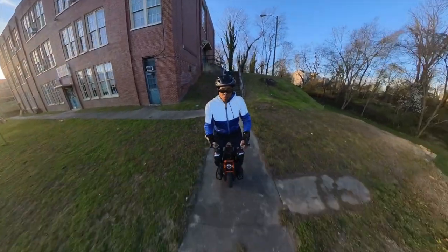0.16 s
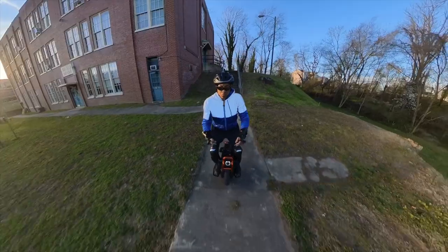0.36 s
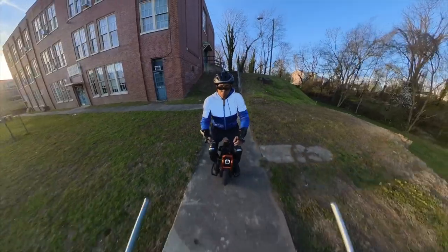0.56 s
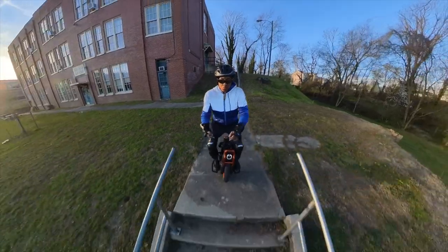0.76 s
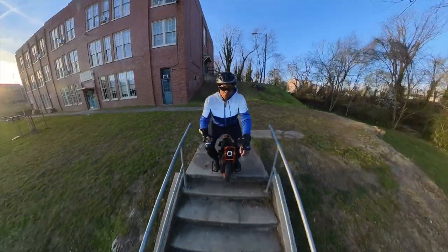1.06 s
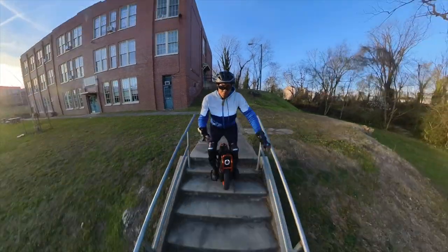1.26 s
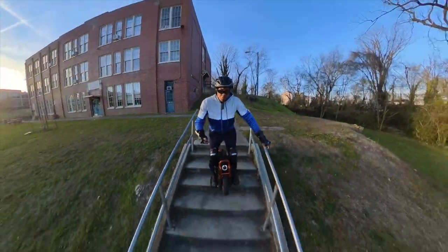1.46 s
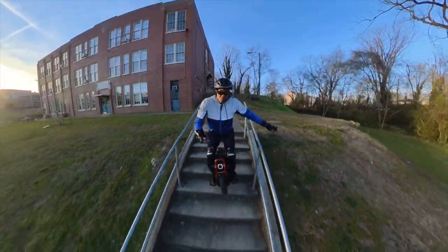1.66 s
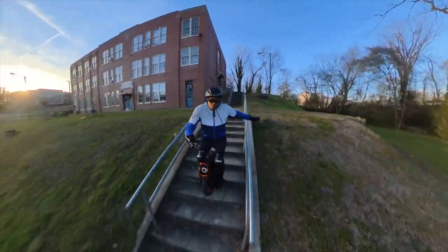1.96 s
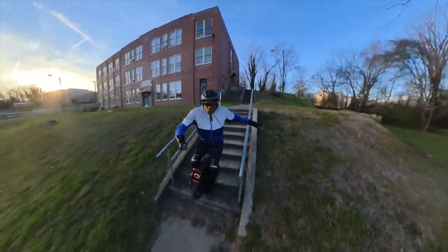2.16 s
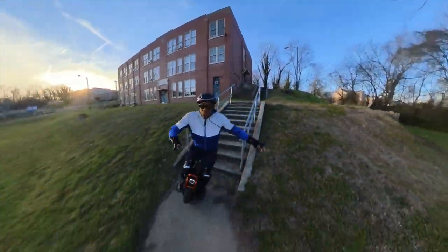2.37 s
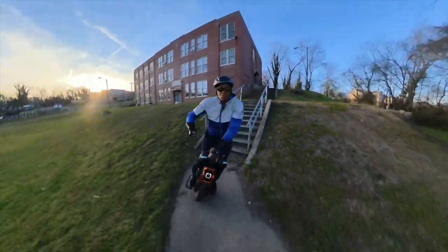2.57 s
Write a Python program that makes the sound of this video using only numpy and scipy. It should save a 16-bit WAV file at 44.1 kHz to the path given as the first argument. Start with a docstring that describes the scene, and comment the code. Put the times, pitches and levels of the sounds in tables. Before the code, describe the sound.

An electric one-wheel vehicle rolls on concrete in wind, then rattles and knocks down outdoor steps

```python
"""On a concrete path and a flight of steps, an electric one-wheel vehicle rolls along, then rides down.
Wind is shaped noise with single swinging buffets; far air, tyre hum and motor whine are shaped noise.
A bird's two faint chirps are gliding tones, and ticks are clicks and short ringing bursts.
On the steps the tyre lands and the plastic shell and pedals knock and rattle: noise bursts through
resonances, with decaying notes, one deep boom and a buzz of loose parts."""
import sys
import numpy as np
from scipy import signal
from scipy.fft import rfft, irfft, next_fast_len
from scipy.io import wavfile
from scipy.ndimage import uniform_filter1d, map_coordinates

SR = 44100
rng = np.random.default_rng(int(sys.argv[2]) if len(sys.argv) > 2 else 0)


def digitize_waveform(pressure):
    """Quantize a signal to 16-bit integers and store it at the path in sys.argv[1].

    Rows of a 2-D input are taken as channels; values are limited to [-1, 1].
    """
    field = np.atleast_2d(pressure).T
    bounded = np.clip(field, -1, 1)
    quanta = np.round(bounded * 32767).astype(np.int16)
    wavfile.write(sys.argv[1], SR, quanta)


N = 119070
T = np.arange(N) / SR  # time of every sample [s]


def amp(db):
    """Turn decibels into a plain gain."""
    return 10 ** (np.asarray(db) / 20)


def unit(x):
    """Scale x to an rms of 1."""
    return x / np.sqrt(np.mean(x ** 2) + 1e-20)


def curve(rows, column=1):
    """Draw straight lines through one column of (time, ..) rows, one value per sample."""
    return np.interp(T, np.transpose(rows)[0], np.transpose(rows)[column])


def wobble(rate):
    """A smooth random curve with rate random points a second."""
    return map_coordinates(rng.standard_normal(int(N * rate / SR) + 4), [T * rate])


def filtered(x, response):
    """Multiply the spectrum of x by a response of frequency."""
    size = next_fast_len(N + 8192)  # spare room so that ringing does not wrap round
    return irfft(rfft(x, size) * response(np.fft.rfftfreq(size, 1 / SR)), size)[:N]


def colour(points):
    """A smooth tone: gain between (frequency, level) points on a log frequency axis."""
    hz, db = np.transpose(points)
    return lambda f: amp(np.interp(np.log(f + 1), np.log(hz + 1), db))


def ringing(modes):
    """Resonances that ring on after a push, falling steeply far above the last one listed."""
    def response(f):
        total = 0
        for k, (centre, width, db) in enumerate(modes):
            resonance = 1j * f * width / (centre * centre - f * f + 1j * f * width)
            total = total + (-1) ** k * amp(db) * resonance  # neighbours have opposite signs
        return total / (1 + 1j * f / (2 * modes[-1][0])) ** 2
    return response


def noise(response, flicker_db=0, patchy_db=0):
    """Coloured noise of rms 1 with a fast flicker and patches of random gain in time and pitch."""
    source = rng.standard_normal(N) * amp(flicker_db * wobble(60))
    spectrum = signal.stft(source, nperseg=256)[2]
    across_pitch = uniform_filter1d(rng.standard_normal(spectrum.shape), 5, 0)
    patches = unit(uniform_filter1d(across_pitch, 9, 1))
    patched = signal.istft(spectrum * amp(patchy_db * patches), nperseg=256)[1][:N]
    return unit(filtered(patched, response))


# Strength of the rolling sounds before trims: (time [s], tyre hum level [dB], motor whine level [dB])
ROLLING_LEVELS = [(0.0, -54, -87.5), (0.532, -55, -82.5), (0.56, -55, -102), (0.644, -53.5, -73),
                  (0.762, -55.5, -90), (0.79, -53, -87.5), (0.95, -54.5, -99), (0.99, -53.5, -83.5),
                  (1.082, -54.5, -102), (1.106, -53, -88), (1.222, -53.5, -80.5), (1.258, -66.5, -102),
                  (1.362, -58, -77), (1.44, -54, -77)]
# Tone of the far air: (frequency [Hz], relative level [dB])
AIR_TONE = [(1290, -30.5), (2200, -11), (3030, -9.5), (3430, -3), (3770, -9), (7790, -15), (10800, -22.5),
            (12500, -37.5), (16200, -67.5), (22000, -120)]


def far_air():
    """Faint patchy hiss whose level dips briefly around 1.26 s."""
    air_db, dip_share = -78, 0.81
    curve_db = curve(ROLLING_LEVELS)
    level = amp(air_db + dip_share * (curve_db - np.median(curve_db)))
    return level * noise(colour(AIR_TONE), patchy_db=4.0)


# Strength of the wind before trims: (time [s], deep rumble level [dB], flutter level [dB])
WIND_LEVELS = [(0.0, -41, -41.5), (0.3, -33, -32), (0.86, -36, -36), (0.88, -29.5, -31), (0.98, -28, -29),
               (1.01, -48, -39.5), (1.08, -18, -27.5), (1.11, -27, -30.5), (1.29, -33.5, -29),
               (1.49, -28, -31), (1.6, -40, -37.5), (1.66, -28, -33.5), (1.8, -38, -34.5),
               (2.03, -26.5, -30), (2.09, -35, -34), (2.16, -27, -21.5), (2.2, -28.5, -32.5),
               (2.23, -23.5, -37), (2.32, -40, -30.5), (2.41, -31.5, -29.5), (2.62, -43.5, -37.5),
               (2.7, -42, -32)]
# Tone of the deep rumble: (frequency [Hz], relative level [dB])
RUMBLE_TONE = [(12, -44.5), (20, -20.5), (44, 3.5), (81, 1), (100, -4.5), (130, -37.5), (220, -120)]
# Tone of the flutter: (frequency [Hz], relative level [dB])
FLUTTER_TONE = [(53, -40.5), (90, -3), (184, -5), (242, -7.5), (378, -25), (450, -28.5), (580, -58),
                (990, -120)]
# A sharper, higher gust: (time [s], level [dB])
GUST_LEVELS = [(1.14, -68), (1.18, -44), (1.22, -30), (1.25, -33.5), (1.28, -22.5), (1.33, -47),
               (1.40, -37.5), (1.45, -77)]
# Tone of that gust: (frequency [Hz], relative level [dB])
GUST_TONE = [(180, -41), (270, 9.5), (400, 4.5), (520, -14), (700, -63), (1100, -120)]
# Single pressure buffets; the swell peaks after the start by its own length, at least 0.3 cycles:
# (start time [s], swell peak level [dB], pitch [Hz], swell length [cycles])
WIND_BUFFETS = [(0.115, -22.5, 167, 2.5), (0.149, -25.5, 228, 1.3), (0.226, -13.5, 168, 0.88),
                (0.242, -12, 196, 1.2), (0.295, -12, 144, 0.86), (0.41, -13.5, 142, 1.2),
                (0.436, -16.5, 195.4, 1.56), (0.556, -21, 168, 2.2), (0.612, -15.5, 208, 1.2),
                (0.84, -23.5, 198.6, 2.4), (0.956, -14.5, 170.3, 1.68), (1.069, -9.5, 92.6, 0.65),
                (1.184, -9.5, 202, 0.57), (1.195, -15.5, 151, 0.75), (1.212, -12, 230, 1.2),
                (1.227, -7.5, 233.4, 1.46), (1.246, -17.5, 192.7, 2), (1.276, -9, 276, 0.48),
                (1.327, -14.5, 220, 0.74), (1.36, -15.5, 163.4, 0.87), (1.4, -12, 158, 0.94),
                (1.452, -25, 188, 0.95), (1.489, -24, 181, 1.8), (1.632, -20, 82, 0.8),
                (1.723, -24, 161.6, 1.3), (1.811, -28, 129, 1.9), (1.89, -23.5, 158, 1.9),
                (1.986, -21, 115, 1.3), (2.048, -28.5, 118, 1.6), (2.14, -20.5, 82, 1.3),
                (2.158, -14, 190, 0.83), (2.232, -26, 109, 0.33), (2.316, -17.5, 194, 1.35),
                (2.414, -15, 104, 1.4), (2.426, -17.5, 138, 2.2), (2.507, -32, 171, 0.59)]


def wind():
    """Moving air makes a deep rumble, a lumpy flutter, a gust and short pressure swings."""
    out = amp(curve(WIND_LEVELS) - 1.5) * noise(colour(RUMBLE_TONE))
    out = out + amp(curve(WIND_LEVELS, column=2) + 3.5) * noise(colour(FLUTTER_TONE), flicker_db=3.0)
    out = out + amp(curve(GUST_LEVELS)) * noise(colour(GUST_TONE))
    for start, db, hz, cycles in WIND_BUFFETS:
        u = (T - start) * hz / max(cycles, .3) - 1
        swing = np.sin(2 * np.pi * hz * (T - start) + rng.uniform(0, 2 * np.pi))
        out = out + amp(db) * np.exp(-u * u) * swing
    return out


# Faint bird chirps, level before its wobble:
# (start time [s], length [s], first pitch [Hz], last pitch [Hz], arch in pitch [Hz], level [dB])
BIRD_CHIRPS = [(0.167, 0.11, 2440, 2650, 70, -68), (0.309, 0.1, 2380, 2240, 60, -72.5)]


def bird():
    """Each chirp is one pure tone that glides along an arch while pitch and level waver."""
    out = np.zeros(N)
    for start, length, first_hz, last_hz, arch_hz, db in BIRD_CHIRPS:
        u = np.clip((T - start) / length, 0, 1)
        arch = np.sin(np.pi * u)
        pitch = first_hz + (last_hz - first_hz) * u + arch_hz * arch + 25 * wobble(70)
        tone = np.sin(2 * np.pi * np.cumsum(pitch) / SR)
        out = out + amp(db + 2.5 * wobble(70)) * arch * tone
    return out


# Short dry ticks, the first one ringing: (time [s], level before boosts [dB], ringing share [0-1])
TICKS = [(0.918, -46, 0.9), (1.2178, -43, 0.05), (1.258, -61, 0.14), (1.268, -68, 0.1),
         (1.278, -55.5, 0.05), (1.3192, -59.5, 0.05)]
# What a tick rings with: (frequency [Hz], width [Hz], relative level [dB])
TICK_MODES = [(2840, 240, -3), (4100, 260, 0), (9700, 600, -12.5)]


def ticks():
    """Each tick mixes a dry snap with a ringing burst and its scattered tail."""
    snaps, rings = np.zeros((2, N))
    scatter = rng.standard_normal(N) * amp(2.0 * wobble(200))
    for s, db, share in TICKS:
        snaps[round(s * SR)] = (1 - share) * amp(db + 13)
        tail = amp(-16.5 - 60 * np.abs(T - s) / 0.17) * (T > s)
        burst = np.exp(-((T - s) / 0.0011) ** 2) + tail
        rings += share * amp(db + 12) * burst * scatter
    crack = colour([(1200, -40.5), (2000, 4), (4500, -5.5), (8000, -15), (11000, -26.5), (13000, -52)])
    return filtered(snaps, crack) + filtered(rings, ringing(TICK_MODES))


def motor_whine():
    """The motor's narrow band of noise sounds like an unsteady note."""
    whine_hz, width_hz, trim_db = 3361, 27, 2
    line = ringing([(whine_hz, width_hz, 0)])
    level = amp(curve(ROLLING_LEVELS, column=2) + trim_db + 1.1 * wobble(31))
    return level * noise(lambda f: line(f) ** 2)  # squared: an even narrower band


# Tone of the tyre on concrete: (frequency [Hz], relative level [dB])
ROAD_TONE = [(180, -38.5), (300, -3.5), (379, -6.5), (415, -4), (664, -8.5), (1020, -14), (1540, -29.5),
             (2600, -47), (3380, -74), (5720, -120)]


def tyre_hum():
    """The tyre rolling on concrete is low noise with a slight flicker."""
    return amp(curve(ROLLING_LEVELS) + 10.0) * noise(colour(ROAD_TONE), flicker_db=0.7)


# Loose parts buzzing: (time [s], level [dB])
RATTLE_LEVELS = [(1.43, -92.5), (1.47, -40.5), (1.75, -42.5), (2.0, -32.5), (2.3, -40), (2.6, -36.5),
                 (2.7, -39)]
# Tone of that buzz: (frequency [Hz], relative level [dB])
BUZZ_TONE = [(190, -41), (330, -7), (412, 1.5), (685, -20.5), (1200, -21.5), (1570, -40), (3410, -39),
             (4330, -42.5), (10900, -49.5), (12400, -51), (14700, -82.5)]


def loose_parts():
    """Loose parts buzz between the knocks as flickering, patchy noise."""
    return amp(curve(RATTLE_LEVELS)) * noise(colour(BUZZ_TONE), flicker_db=3.0, patchy_db=2.0)


def landing_boom():
    """A hard landing booms in the tyre: one low note that rises fast and dies away."""
    start, level_db, hz = 1.579, -5, 285.6  # s, dB before the rise, Hz
    rise, t60 = 0.0029, 0.069  # s, s to fall by 60 dB
    t = np.maximum(T - start, 0)
    return amp(level_db - 60 * t / t60) * (1 - np.exp(-t / rise)) * np.sin(2 * np.pi * hz * t)


# Knocks on the steps, levels before trims and envelopes:
# (time [s], shell level [dB], shell note [Hz], slap level [dB], clack level [dB], treble level [dB],
#  rise time [s], time to fall by 60 dB [s], hardness [0-1]); rise and fall are adjusted per layer
STEP_KNOCKS = [(1.441, -47, 366, -41, -61, -68, 0.002, 0.04, 0.56),
               (1.461, -49.5, 430, -36, -55, -54.5, 0.0021, 0.046, 0.36),
               (1.493, -50, 434, -41, -53, -57, 0.0028, 0.046, 0.15),
               (1.509, -29, 420, -33, -50, -60, 0.00087, 0.062, 0.7),
               (1.532, -21.5, 523, -31.5, -50, -47, 0.0041, 0.067, 0.7),
               (1.557, -17, 333, -25.5, -41.5, -43.5, 0.0039, 0.035, 0.2),
               (1.577, -16, 403, -22, -26, -34.5, 0.0011, 0.045, 0.07),
               (1.637, -45, 342, -46, -56, -71, 0.003, 0.035, 0.4),
               (1.666, -18, 465, -23.5, -35, -56.5, 0.0006, 0.018, 0.78),
               (1.686, -19, 404, -31.5, -43, -43.5, 0.0045, 0.059, 0.4),
               (1.727, -26.5, 398, -35.5, -47, -45, 0.0096, 0.067, 0.7),
               (1.79, -23, 510, -28.5, -48.5, -59.5, 0.00082, 0.045, 1),
               (1.81, -11, 431, -27, -43.5, -44, 0.0076, 0.06, 0.66),
               (1.851, -51, 440, -35, -64, -48, 0.0038, 0.067, 0.54),
               (1.917, -21, 386, -27, -41, -67, 0.0025, 0.038, 1),
               (1.938, -14.5, 420, -29, -49, -48.5, 0.0023, 0.048, 0.9),
               (1.976, -26.5, 390, -36.5, -57, -45.5, 0.0026, 0.035, 0.8),
               (2.013, -12.5, 426, -21, -38.5, -43.5, 0.0038, 0.079, 0.63),
               (2.033, -9.5, 407, -30, -53, -51, 0.0027, 0.034, 1),
               (2.068, -20.5, 446, -29, -55, -59, 0.0043, 0.074, 0.23),
               (2.122, -16.5, 420, -24.5, -33.5, -42, 0.0032, 0.043, 0.8),
               (2.144, -9.5, 460, -18, -41, -41.5, 0.0016, 0.017, 0.36),
               (2.187, -18.5, 430, -33, -51, -35.5, 0.016, 0.044, 0.3),
               (2.23, -18, 385, -34.5, -46, -44, 0.00078, 0.027, 0.9),
               (2.2344, -17, 420, -21, -26.5, -34, 0.00063, 0.032, 0.16),
               (2.252, -12.5, 430, -27, -54, -40.5, 0.0044, 0.031, 0.6),
               (2.296, -16, 474, -40, -56, -65, 0.0019, 0.022, 0.95),
               (2.322, -14, 354, -24.5, -40, -45, 0.0021, 0.056, 0.6),
               (2.341, -19, 453, -33, -53.5, -54.5, 0.0017, 0.076, 0.4),
               (2.382, -15.5, 484, -32.5, -52.5, -76, 0.0021, 0.019, 0.77),
               (2.415, -9, 547, -22.5, -33, -37, 0.0039, 0.02, 0.33),
               (2.436, -9.5, 468, -30.5, -42, -44, 0.0032, 0.041, 0.55),
               (2.467, -21.5, 397, -35.5, -52, -54, 0.0025, 0.04, 0.5),
               (2.51, -11, 430, -22, -33.5, -32, 0.0014, 0.028, 0.3),
               (2.525, -3.5, 455, -16, -31, -36, 0.0028, 0.032, 0.15),
               (2.554, -8, 537, -16.5, -36.5, -35.5, 0.0028, 0.035, 0.53),
               (2.574, -17, 410, -29, -31, -42, 0.0025, 0.05, 0.4),
               (2.618, -55, 385, -55, -45, -50, 0.0025, 0.031, 0.5)]
# Resonances of the plastic shell: (frequency [Hz], width [Hz], relative level [dB])
SHELL_MODES = [(308, 140, -11.5), (432.6, 60, 0), (515, 75, -4.5), (632, 161, -8)]
# Resonances of the slap: (frequency [Hz], width [Hz], relative level [dB])
SLAP_MODES = [(794, 166, 0.5), (1028, 450, 2.5), (1192, 432, 1), (1495, 150, -10)]
# Resonances of the clack: (frequency [Hz], width [Hz], relative level [dB])
CLACK_MODES = [(1655, 250, 3.5), (1954, 440, 3.5), (2542, 490, 2), (3350, 530, 2), (4100, 260, -3.5)]
# Tone of the treble hiss: (frequency [Hz], relative level [dB])
HISS_TONE = [(2530, -16), (4300, 3), (6100, -1), (6630, -0.5), (11000, -5), (13300, -14), (14700, -39.5)]

# Four layers in this order: shell, slap, clack, hiss
LAYER_TRIM_DB = [-3.5, 0.5, 0.5, 2]
RISE_RATIO = np.array([[1], [1], [1], [0.94]])
FALL_RATIO = np.array([[1], [1], [1], [0.73]])
FALL_BEND = np.array([[1.27], [1.27], [1.046], [1.494]])  # above 1: the burst holds, then stops short
TAIL_DB, TAIL_T60_S = -22, 0.33  # the rattle that follows a knock
BLOW_DB = np.array([21.5, 16])  # first contact: slap, clack
RING_DB, RING_LONGER = -2, 1.16  # the shell's own note
PING_DB, PING_SCATTER_DB, PING_DETUNE = -8, 3, 0.0323  # clack notes, mixed anew for each knock


def knocks():
    """Blows and bursts of scrape ring the shell, slap, clack and hiss, with clear notes on top."""
    power, blows = np.zeros((2, 4, N + SR))
    notes, t = np.zeros(N + SR), np.arange(SR // 3) / SR
    chance = rng.standard_normal((len(STEP_KNOCKS), 2, len(CLACK_MODES), 1))
    clack_hz, _, clack_db = np.transpose(CLACK_MODES)[..., None]
    for (s, shell_db, hz, *upper_db, rise, t60, hard), (louder, off) in zip(STEP_KNOCKS, chance):
        start = round(s * SR)
        at = slice(start, start + len(t))
        rise, t60 = max(rise, 1e-4), max(t60, .005)
        swell = 1 - np.exp(-t / (rise * RISE_RATIO))
        swell[3] = swell[3] ** 2  # the hiss starts more gently
        fall = amp(-60 * (t / t60 / FALL_RATIO) ** FALL_BEND)
        tail = amp(TAIL_DB - 60 * t / TAIL_T60_S)
        level = amp([shell_db, *upper_db])[:, None]
        power[:, at] += (level * swell * (fall + tail)) ** 2  # overlapping bursts add as power
        blows[1:3, start] = hard * amp(upper_db)[:2] * amp(BLOW_DB)
        shell_level = amp(shell_db + RING_DB - 60 * t / (RING_LONGER * t60))
        notes[at] += shell_level * swell[0] * np.sin(2 * np.pi * hz * t)
        ping_hz = clack_hz * (1 + PING_DETUNE * off)
        pings = amp(clack_db + PING_SCATTER_DB * louder) * np.sin(2 * np.pi * ping_hz * t)
        notes[at] += amp(upper_db[1] + PING_DB) * swell[2] * fall[2] * pings.sum(axis=0)
    scrapes = [rng.standard_normal(N),
               noise(np.ones_like, flicker_db=3.5),
               noise(np.ones_like, flicker_db=0.5, patchy_db=3.5),
               noise(np.ones_like, patchy_db=3)]
    tones = [ringing(SHELL_MODES), ringing(SLAP_MODES), ringing(CLACK_MODES), colour(HISS_TONE)]
    out = notes[:N]
    for p, blow, scrape, tone, db in zip(power[:, :N], blows[:, :N], scrapes, tones, LAYER_TRIM_DB):
        layer = filtered(np.sqrt(p) * scrape + blow, tone)
        out = out + amp(db) * layer / np.std(filtered(scrape, tone))
    return out


def scene():
    """Add all sources, from the background to the knocks, in one channel."""
    background = far_air() + wind() + bird() + ticks()
    vehicle = motor_whine() + tyre_hum() + loose_parts() + landing_boom() + knocks()
    return (background + vehicle)[None]


def record(dry):
    """Keep nothing at or above the upper band limit."""
    top_hz = 14860
    return filtered(dry[0], lambda hz: hz < top_hz)[None]


dry = scene()
out = record(dry)
digitize_waveform(out)
```